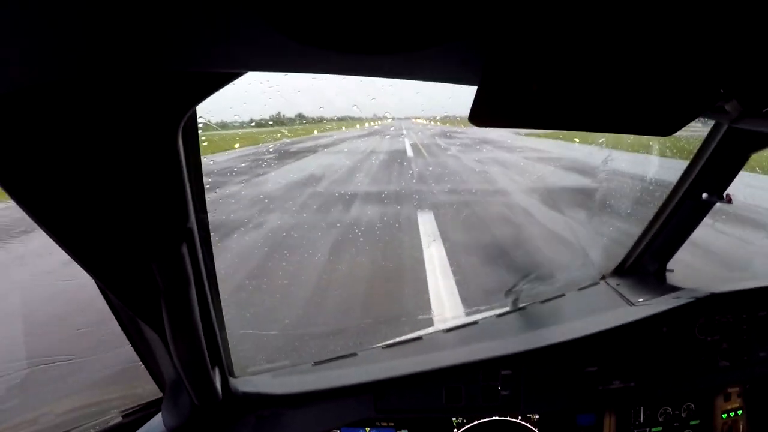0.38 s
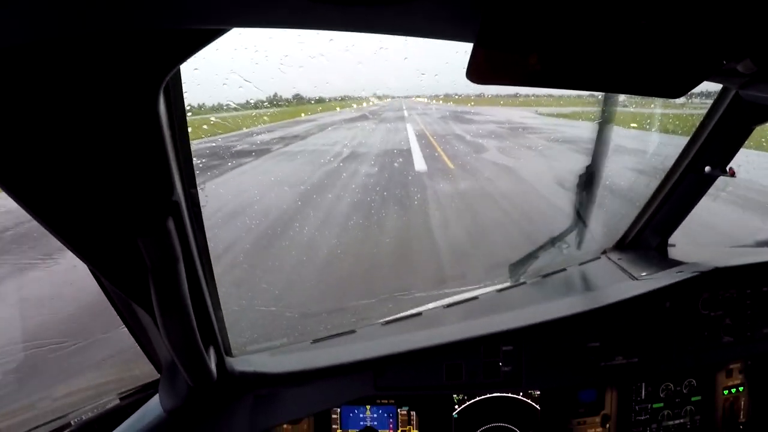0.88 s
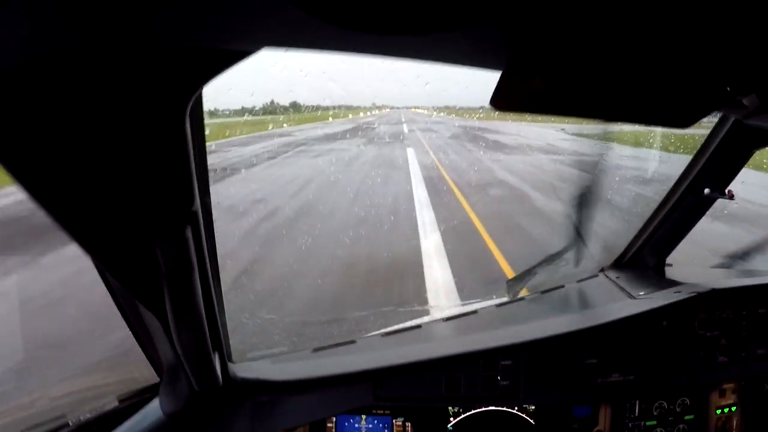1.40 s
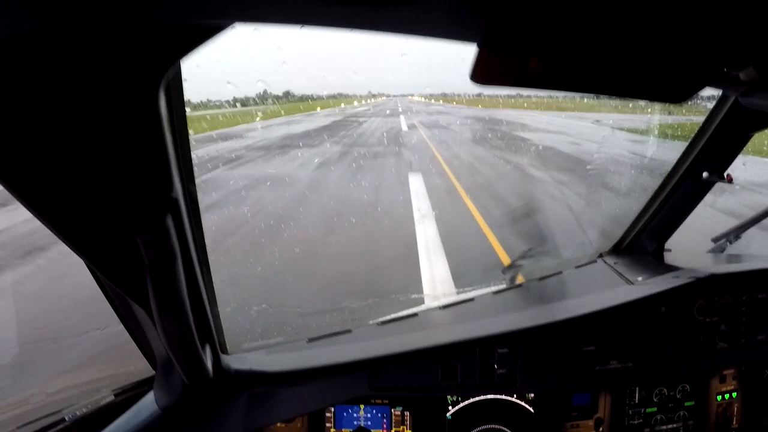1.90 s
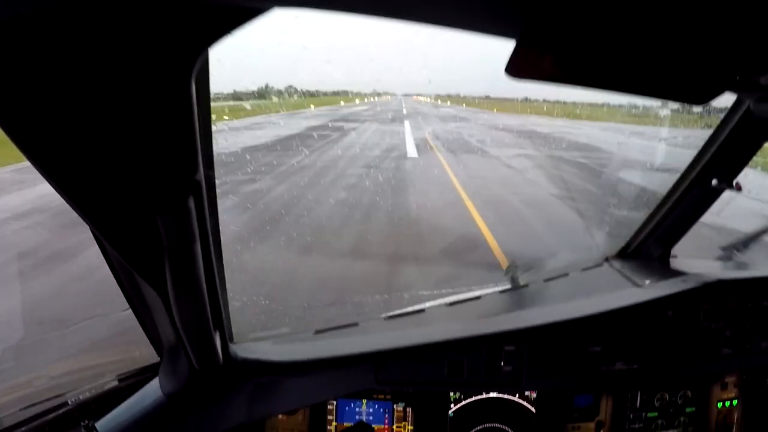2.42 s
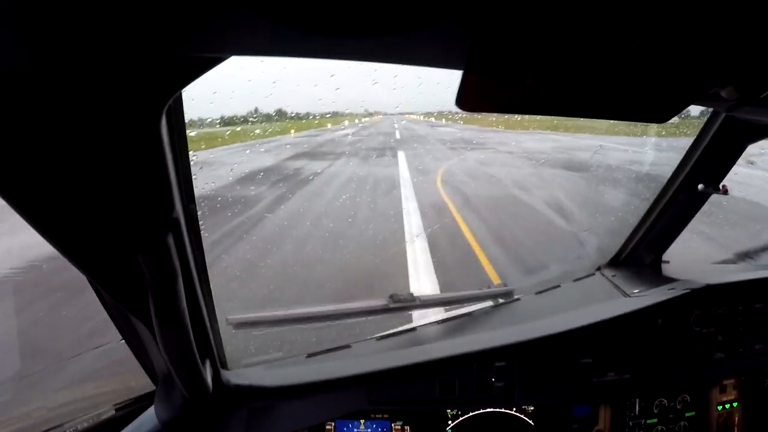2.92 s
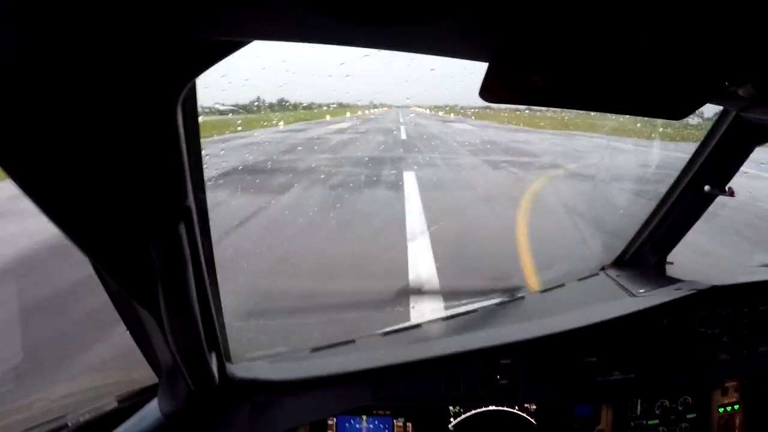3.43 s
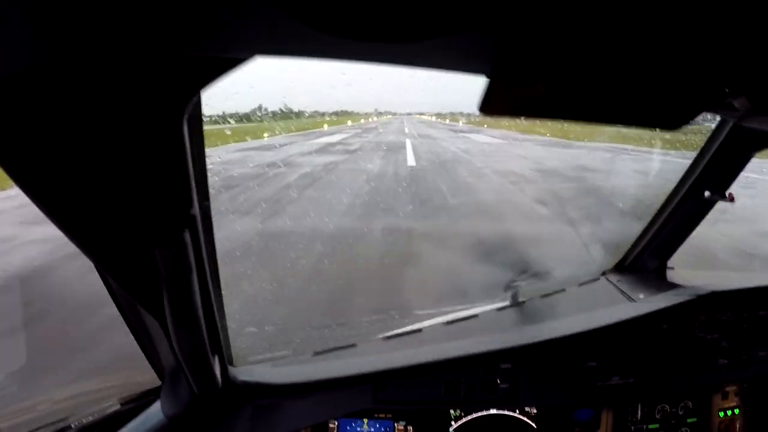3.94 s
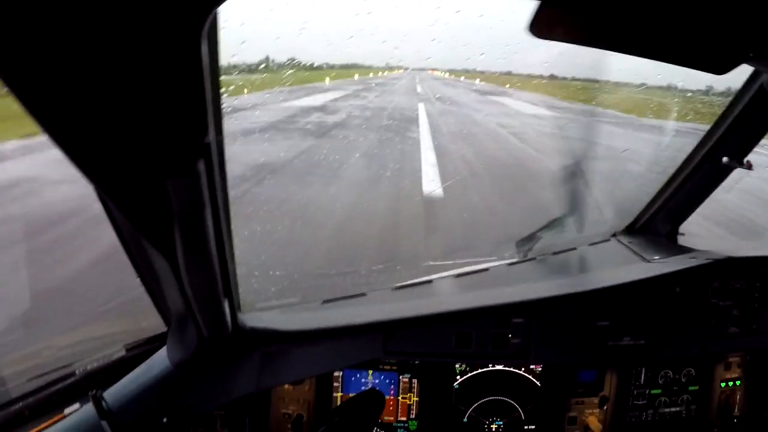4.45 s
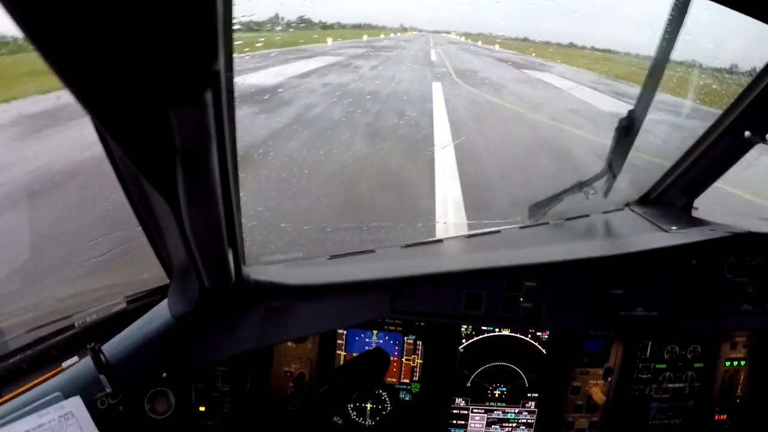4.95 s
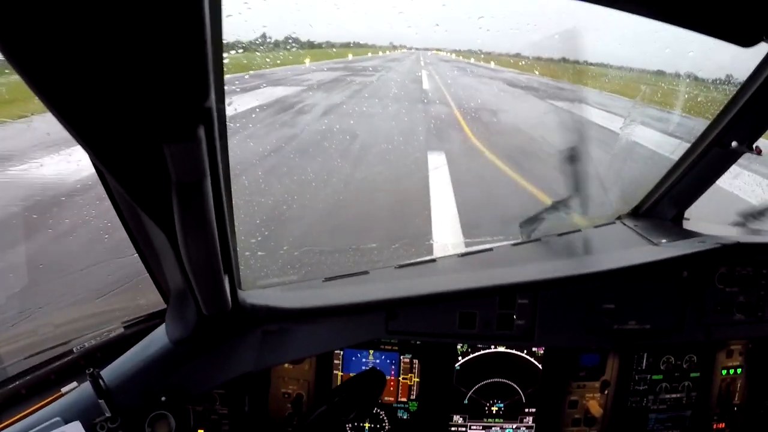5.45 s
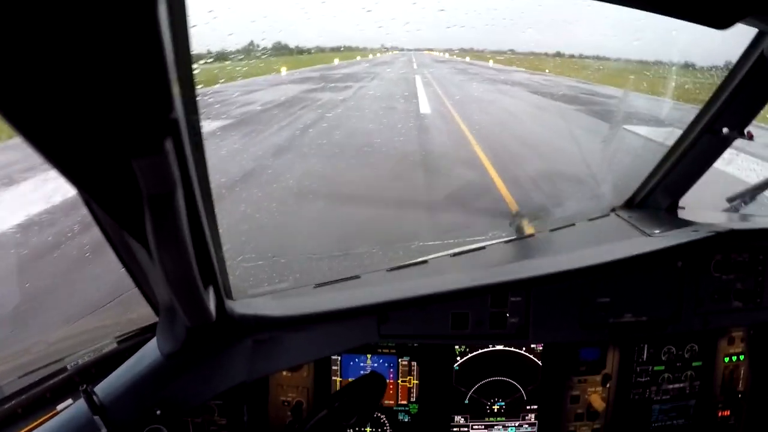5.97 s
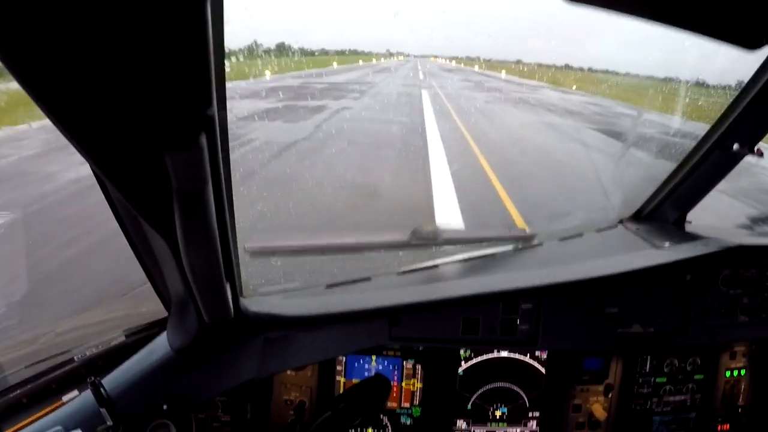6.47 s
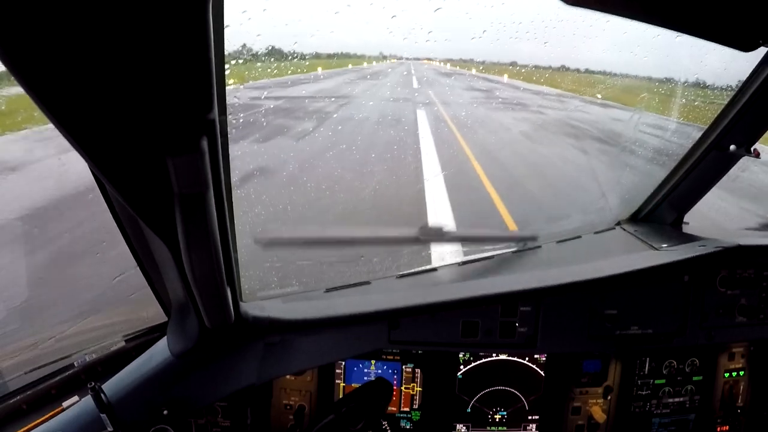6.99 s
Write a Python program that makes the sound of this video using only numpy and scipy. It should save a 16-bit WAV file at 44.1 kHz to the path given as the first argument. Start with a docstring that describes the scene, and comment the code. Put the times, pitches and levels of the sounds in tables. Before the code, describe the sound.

Deep airframe shudder and irregular muffled bumps dominate a steady, grainy propeller drone and soft ventilation hiss that dip whenever the shaking peaks.

```python
"""Cockpit of a turboprop rolling along a wet runway.
The airframe shakes below 30 Hz as four swinging modes, kicked by jolts; the wheels thud, rumble and spray as noise bands.
Propeller blades hum roughly as smeared multiples of the blade rate, air hisses as noise lifted by duct resonances,
and two gear tones whine faintly. A gain control ducks everything during the hardest shakes."""
import sys
import numpy as np
from scipy import signal
from scipy.fft import rfft, irfft
from scipy.io import wavfile
from scipy.ndimage import uniform_filter1d

SR = 44100
rng = np.random.default_rng(int(sys.argv[2]) if len(sys.argv) > 2 else 0)


def wrap_up_sound(samples):
    """Save the sound to the file named by the first command line argument, as 16-bit audio."""
    columns = np.atleast_2d(samples).T
    # keep every value between -1 and 1, then stretch to whole-number steps
    tamed = np.clip(columns, -1, 1)
    steps = np.round(tamed * 32767).astype(np.int16)
    wavfile.write(sys.argv[1], SR, steps)


def makeup_ratio(level_db):
    """Linear amplitude ratio for a level in decibels (20 dB per factor of ten)."""
    decades = np.asarray(level_db, float) / 20
    return 10 ** decades


N = 313595
TIME = np.arange(N) / SR
HZ = np.maximum(np.fft.rfftfreq(N, 1 / SR), 1)


def rms_one(x):
    """Normalisation: scale to unit rms."""
    return x / np.sqrt(np.mean(x ** 2) + 1e-20)


def in_time(rows):
    """Linear interpolation: columns of a table over time, sample by sample."""
    s, *columns = np.transpose(rows)
    return [np.interp(TIME, s, column) for column in columns]


def shape(points):
    """Spectral envelope: gain interpolated over log frequency, silent outside the table."""
    hz, db = np.transpose(points)
    return makeup_ratio(np.interp(np.log(HZ), np.log(hz), db, left=-120, right=-120))


def peak(hz, width):
    """Simple resonance: magnitude 1 on top, half power across the width."""
    return 1 / np.sqrt(1 + (2 * (HZ - hz) / width) ** 2)


def drift(corner_hz):
    """Random modulation: white noise through two equal low-pass poles, unit rms."""
    hop, settle = 40, 2000  # samples per slow step, slow steps discarded
    r = np.exp(-2 * np.pi * corner_hz * hop / SR)
    white = rng.standard_normal(N // hop + settle + 2)
    slow = signal.lfilter([1], [1, -2 * r, r * r], white)[settle:]
    return np.interp(np.arange(N) / hop, np.arange(len(slow)), rms_one(slow))


def noise(gains, patchy_db, even_s):
    """Filtered noise: two interleaved sets of bands fluctuate apart; slow swells are evened to about unit rms."""
    turn = 3 * np.pi * np.log2(HZ)
    out = 0
    for bands in (np.cos(turn), np.sin(turn)):
        coloured = irfft(rfft(rng.standard_normal(N)) * gains * bands, N)
        out = out + makeup_ratio(patchy_db * drift(4.1)) * coloured
    span = max(round(even_s * SR), 1)
    power = uniform_filter1d(uniform_filter1d(out ** 2, span), span)
    return out / np.sqrt(power + 1e-20)


# treble self-noise spectrum: f/Hz, relative density/dB
HISS = [(4000, -14.5), (7000, -1), (10000, -2.5), (13000, -5), (17000, -7.5)]


def microphone():
    """Self-noise: a smooth random hiss that fills the treble."""
    return makeup_ratio(-66.5) * noise(shape(HISS), patchy_db=0, even_s=1)


# gear tones: t/s, left engine f/Hz, right engine f/Hz
WHINE = [(0, 4270, 4420), (1.0, 4235, 4385), (2.2, 4290, 4375), (4.3, 4288, 4373), (5.0, 4325, 4400),
         (5.6, 4336, 4440), (7.11, 4336, 4440)]
# median rms of the left and right gear tones: level/dB
WHINE_DB = [-77, -78]


def gearbox():
    """Frequency and amplitude modulation: a thin tone from each engine drifts in pitch and fades in and out."""
    out = 0
    for hz, db in zip(in_time(WHINE), WHINE_DB):
        wavering_hz = hz * (1 + 0.0006 * drift(2.5))
        phase = 2 * np.pi * np.cumsum(wavering_hz) / SR
        level = makeup_ratio(db + 4.8 * drift(0.98))
        out = out + np.sqrt(2) * level * np.sin(phase)
    return out


# ventilation and intake hiss before the duct lifts: f/Hz, relative density/dB
AIR = [(820, -15), (1400, -3.5), (1610, -4), (1960, -4.5), (2750, -11.5), (3040, -13), (3250, -8),
       (3410, -7.5), (4460, -14), (5240, -24.5), (6410, -26), (7000, -30), (9100, -56), (15400, -120)]
# duct resonances: f/Hz, width at half the lift/Hz, lift/dB
DUCT_MODES = [(1910, 150, 0.5), (3323, 71, 4.5), (4250, 250, -1), (4620, 120, 1.5), (6450, 550, 6)]


def air():
    """Duct resonance: ventilation and intake hiss is lifted around each mode."""
    gains = shape(AIR)
    for hz, width, lift_db in DUCT_MODES:
        gains = gains * makeup_ratio(lift_db * peak(hz, width) ** 2)
    return makeup_ratio(-46.5) * noise(gains, patchy_db=0.88, even_s=0.22)


def strand(hz, corner_hz):
    """Quadrature modulation: slow noise on a sine and a cosine makes a narrow band around a moving pitch."""
    phase = 2 * np.pi * np.cumsum(hz) / SR
    return drift(corner_hz) * np.sin(phase) + drift(corner_hz) * np.cos(phase)


# propellers: t/s, blade tones level/dB, broad hum level/dB, wash on the fuselage level/dB
PROPELLERS = [(0, -41.5, -36.5, -40), (1.0, -42, -37.5, -40), (1.6, -42, -37.5, -41),
              (3.2, -39, -38.5, -40.5), (4.0, -39.5, -36, -39.5), (4.7, -38.5, -37.5, -40.5),
              (6.2, -39.5, -39, -40.5), (6.6, -42, -39.5, -40.5), (7.11, -49, -37, -42)]
# wavering strands near two blade-rate multiples: t/s, sixth f/Hz, level/dB, seventh f/Hz, level/dB
STRANDS = [(0, 468, -46, 572.3, -43), (1.6, 470, -45.5, 578.3, -41), (2.3, 473, -45.5, 563.6, -44),
           (3.2, 480, -43.5, 565.4, -38.5), (4.4, 477.7, -39, 562, -38.5), (5.1, 477, -42.5, 549, -42.5),
           (6.2, 481, -39.5, 560.5, -46.5), (7.11, 480, -42, 559, -48.5)]
# humps on or beside multiples of the blade rate: multiple, width before sharpening/Hz, relative level/dB
BLADE_ORDERS = [(4.1, 31, -11.5), (5.0, 21, -5.5), (5.7, 66, -9.5), (7.4, 82, -10), (8.0, 43, -5),
                (9.9, 20, -10)]
# broad hum spectrum: f/Hz, relative density/dB
HUM_BED = [(290, -39), (330, -10.5), (450, -9), (515, -11.5), (620, -10.5), (720, -11.5), (800, -14.5),
           (870, -20.5), (1000, -33)]
# wash spectrum: f/Hz, relative density/dB
WASH = [(780, -12.5), (860, -8), (915, -1.5), (980, -0.5), (1040, -5), (1100, -7), (1250, -7),
        (1400, -12.5), (1550, -19.5), (1800, -26)]


def propellers():
    """Blade-rate radiation: blades cut turbulent air, so each multiple is a smeared band, not a line."""
    blade_hz = 80
    tone_db, bed_db, wash_db = in_time(PROPELLERS)
    low_hz, low_db, high_hz, high_db = in_time(STRANDS)
    power = 0
    for multiple, width, db in BLADE_ORDERS:
        # the fourth power sharpens the hump, as two resonances in series would
        power = power + makeup_ratio(2 * db) * peak(multiple * blade_hz, width) ** 4
    tones = makeup_ratio(tone_db) * noise(np.sqrt(power), patchy_db=0.2, even_s=0.059)
    low_strand = makeup_ratio(low_db) * strand(low_hz, corner_hz=13.5)
    high_strand = makeup_ratio(high_db) * strand(high_hz, corner_hz=16.7)
    bed = makeup_ratio(bed_db) * noise(shape(HUM_BED), patchy_db=0.86, even_s=0.2)
    wash = makeup_ratio(wash_db) * noise(shape(WASH), patchy_db=0.8, even_s=0.26)
    return tones + low_strand + high_strand + bed + wash


# joints and bumps in the runway: peak t/s, added shudder level/dB, bending level/dB, thud level/dB
JOLTS = [(.08, -29, -36, -25), (.36, -12, -35, -32), (.55, -16.5, -30, -30), (.73, -10, -23, -24),
         (.93, -9, -11, -35), (1.17, -8.5, -20, -28), (1.29, -5, -12.5, -33), (1.459, -10, -26, -30),
         (1.62, -14, -16.5, -27), (1.79, -12.5, -17, -38), (1.901, -16.5, -30, -31),
         (2.1, -8.5, -34, -26.5), (2.47, -14, -22.5, -31), (2.82, -11.5, -23, -36), (3.221, -8, -25, -28),
         (3.42, -18, -5, -21), (3.58, -12, -13, -35), (3.82, -9.5, -29, -29), (4.051, -10, -10, -37),
         (4.36, -18.5, -13, -29), (4.55, -11.5, -14.5, -30), (4.72, -14, -17, -24), (4.9, -18, -28, -28),
         (5.19, -16, -13, -42), (5.55, -23, -17.5, -35), (6.08, -24, -24, -34), (6.34, -9.5, -14.5, -44),
         (6.65, -10, -25, -38), (6.85, -16.5, -22, -25)]
# jolt slopes, one row each for shudder, bending and thud: rise/(dB/s), fall/(dB/s)
JOLT_SLOPES = [(164, 128), (110, 96), (200, 152)]


def jolted(between_db, peaks_db, slopes):
    """Power addition: a steady level plus an exponential swell and decay at every jolt."""
    rise, fall = slopes
    power = makeup_ratio(2 * between_db)
    for (s, *_), peak_db in zip(JOLTS, peaks_db):
        below_peak_db = np.maximum(rise * (s - TIME), fall * (TIME - s))
        power = power + makeup_ratio(2 * (peak_db - below_peak_db))
    return np.sqrt(power)


# wheels on the runway: t/s, thud between jolts level/dB, rumble level/dB, spray and wiper drag level/dB
ROLLING = [(0, -44, -39.5, -41.5), (.7, -26, -38.5, -43.5), (1.3, -36, -42.5, -44.5),
           (2.6, -32.5, -43, -46.5), (3.0, -33.5, -40.5, -39.5), (3.23, -34, -44, -39),
           (3.35, -36, -43, -46), (4.3, -31, -40, -44.5), (5.5, -35.5, -41.5, -46.5),
           (5.66, -33, -43.5, -42.5), (6.3, -39, -41.5, -43), (6.5, -33, -41.5, -45),
           (7.11, -43, -41, -49.5)]
# thud spectrum: f/Hz, relative density/dB
THUD = [(22, -15), (30, 0), (40, 1.5), (55, -5.5), (70, -14.5), (90, -31.5)]
# floor rumble spectrum: f/Hz, relative density/dB
RUMBLE = [(55, -15), (75, -1.5), (95, 0.5), (110, -2.5), (127, 1), (145, -6.5), (170, -13)]
# spray and wiper drag spectrum: f/Hz, relative density/dB
SPRAY = [(135, -20), (165, -1.5), (190, -4), (215, -8), (240, -3), (280, -5), (300, -4), (340, -8.5)]


def wheels():
    """Rolling excitation: tyres on wet ground thud, rumble in the floor and spray under the nose."""
    thud_db, rumble_db, spray_db = in_time(ROLLING)
    _, _, _, thud_kicks = np.transpose(JOLTS)
    thud_level = jolted(thud_db, thud_kicks, JOLT_SLOPES[2])
    thud = thud_level * noise(shape(THUD), patchy_db=4.0, even_s=0.037)
    rumble = makeup_ratio(rumble_db) * noise(shape(RUMBLE), patchy_db=3.5, even_s=0.15)
    spray = makeup_ratio(spray_db) * noise(shape(SPRAY), patchy_db=4.5, even_s=0.15)
    return thud + rumble + spray


# centre pitch of the shudder mode: t/s, f/Hz
SHUDDER = [(0, 16.8), (1.099, 19.3), (1.199, 22.5), (3.3, 21.5), (3.4, 21.1), (4.2, 20.3), (4.4, 18.4),
           (5.9, 17.8), (6.3, 19.4), (7.11, 16.2)]
# median swing kept up by runway roughness between jolts: t/s, heave level/dB, bending level/dB, shudder level/dB
ROUGHNESS = [(0, -30, -25, -22.5), (.5, -21.5, -31, -24.5), (2.3, -17.5, -31.5, -21.5),
             (3.2, -29, -22, -22.5), (4.0, -19.5, -20, -16), (4.8, -16, -25, -20.5),
             (5.3, -19.5, -36, -28.5), (6.4, -23.5, -28, -26.5), (7.11, -31, -30, -27)]


def airframe():
    """Modal vibration: each mode swings near its own pitch, wavering at random; jolts kick all but the heave."""
    heave_hz, bending_hz, partner_hz = 6.6, 13.2, 24.55
    waver_db, waver_corner_hz = 2.5, 3.2
    heave_db, bending_db, shudder_db = (db + waver_db * drift(waver_corner_hz) for db in in_time(ROUGHNESS))
    _, shudder_kicks, bending_kicks, _ = np.transpose(JOLTS)
    heave = makeup_ratio(heave_db)
    shudder = jolted(shudder_db, shudder_kicks, JOLT_SLOPES[0])
    bending = jolted(bending_db, bending_kicks, JOLT_SLOPES[1])
    # a mode just above the shudder swings with it, usually weaker
    partner = shudder * makeup_ratio(-8 + waver_db * drift(waver_corner_hz))
    pitches = heave_hz, bending_hz, in_time(SHUDDER)[0], partner_hz
    out = 0
    for hz, level in zip(pitches, (heave, bending, shudder, partner)):
        wavering_hz = hz * (1 + 0.0379 * drift(2.63))
        phase = 2 * np.pi * (np.cumsum(wavering_hz) / SR + rng.random())
        out = out + np.sqrt(2) * level * np.sin(phase)
    return out


def scene():
    """Superposition: the pressures of all sources and the self-noise add in one microphone."""
    return (microphone() + gearbox() + air() + propellers() + wheels() + airframe())[None]


def top_cut(x):
    """Nothing passes above the cut-off."""
    return signal.sosfilt(signal.butter(12, 15710, fs=SR, output="sos"), x)


def record(dry):
    """Automatic gain control: short-term power above a threshold ducks the whole mix and lets go slowly."""
    threshold_db, duck_share, release_db_per_s = -11, 0.66, 33
    sense_s, smoothing_hz = 0.048, 5
    power = uniform_filter1d(dry[0] ** 2, round(sense_s * SR))
    over_db = np.maximum(10 * np.log10(power + 1e-12) - threshold_db, 0)
    # hold each peak, falling at the release rate
    fall_db = release_db_per_s * TIME
    held_db = np.maximum.accumulate(over_db + fall_db) - fall_db
    r = np.exp(-2 * np.pi * smoothing_hz / SR)
    smooth_db = signal.lfilter([1 - r], [1, -r], held_db)
    mix = dry * makeup_ratio(-duck_share * smooth_db)
    return top_cut(mix)


dry = scene()
out = record(dry)
wrap_up_sound(out)
```